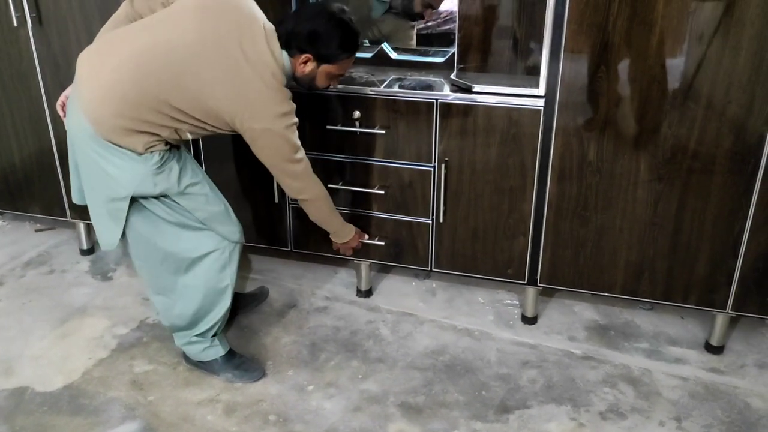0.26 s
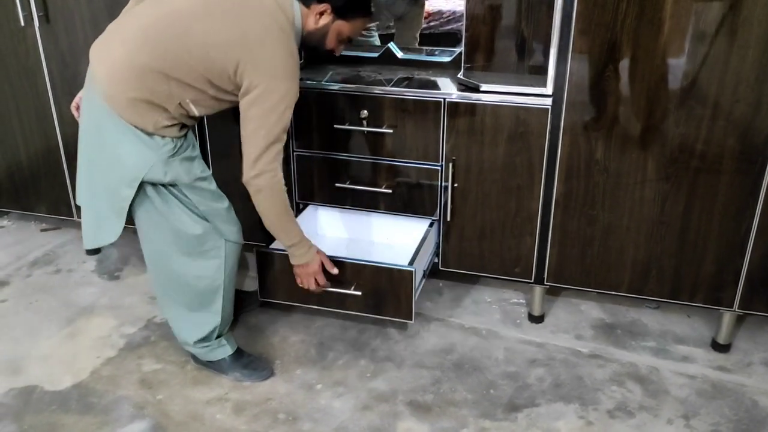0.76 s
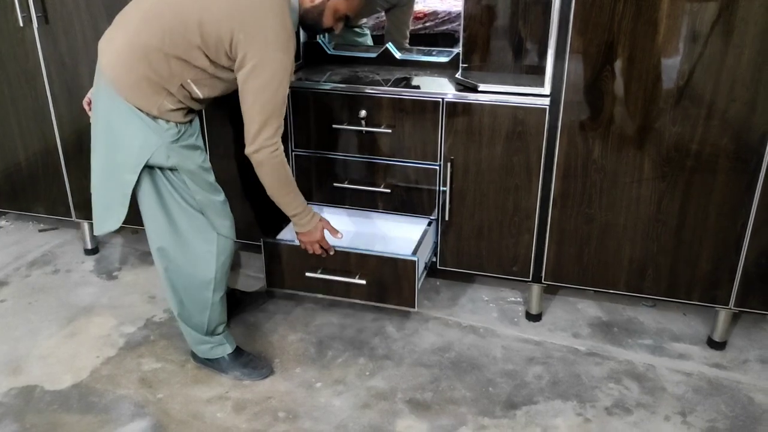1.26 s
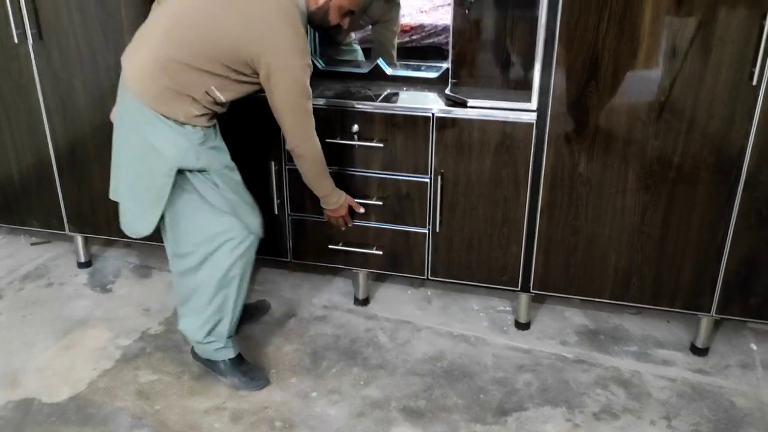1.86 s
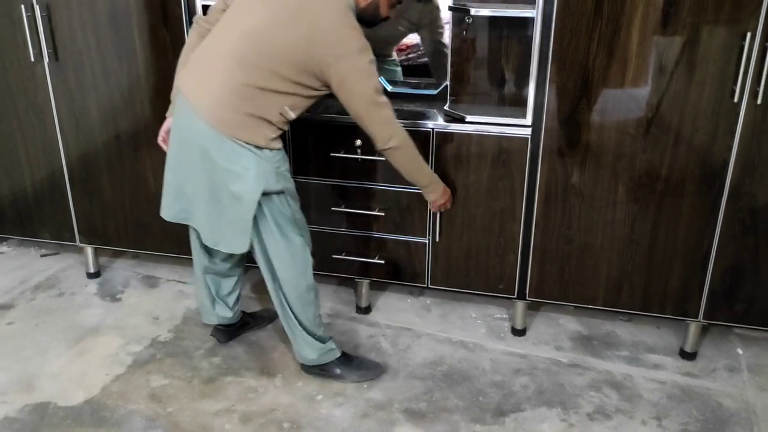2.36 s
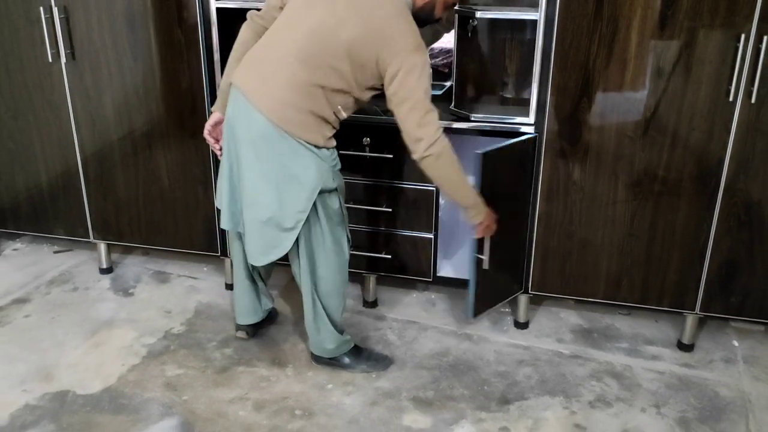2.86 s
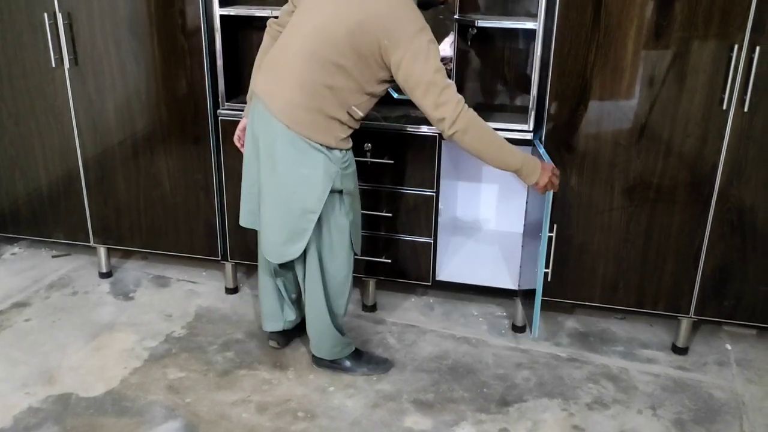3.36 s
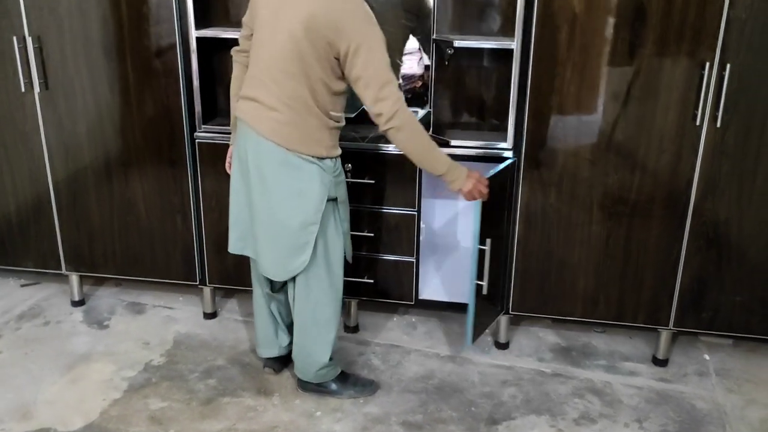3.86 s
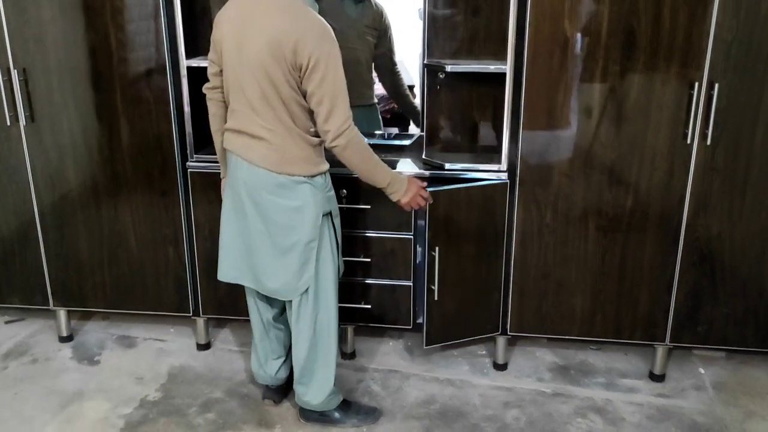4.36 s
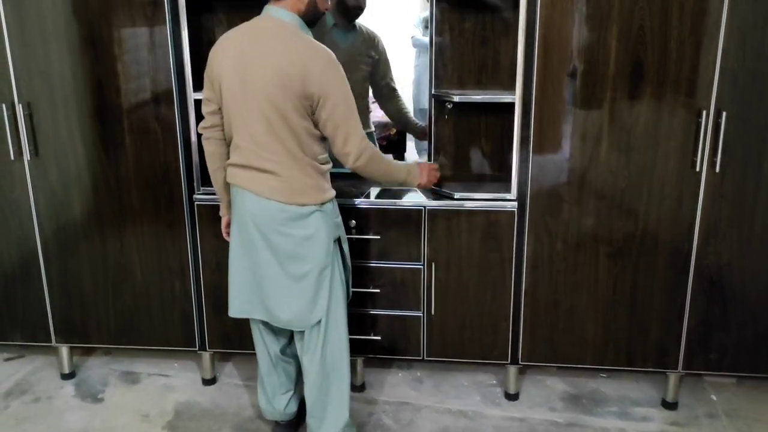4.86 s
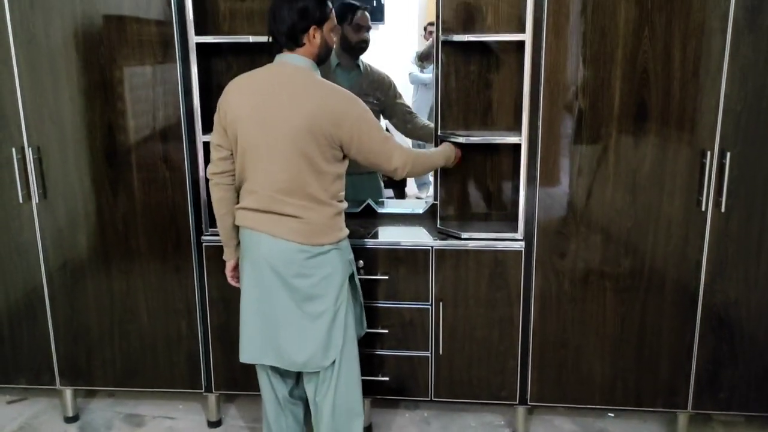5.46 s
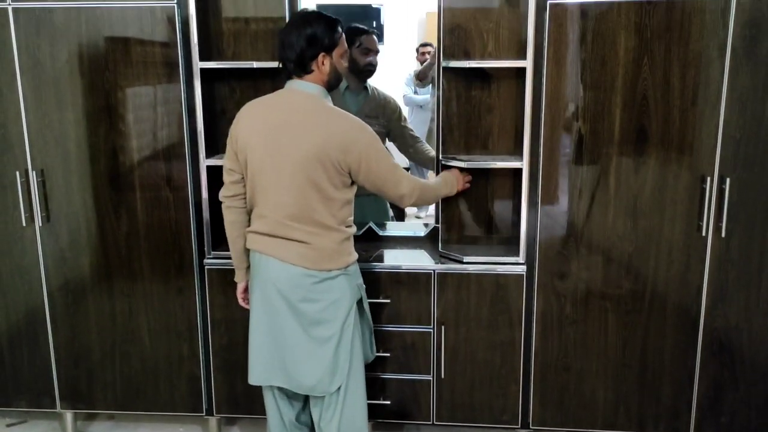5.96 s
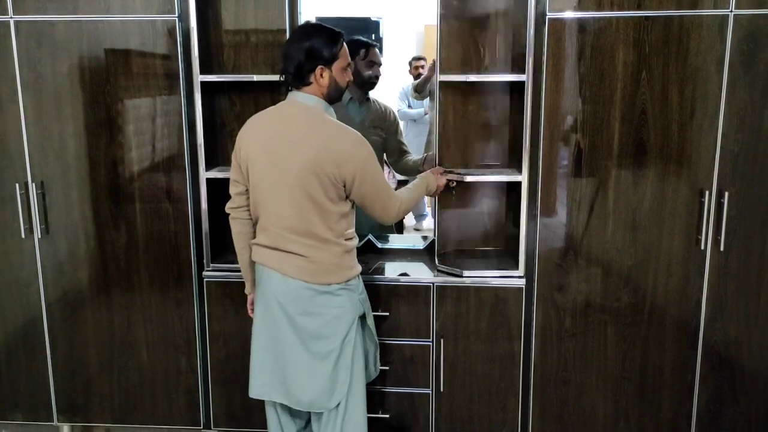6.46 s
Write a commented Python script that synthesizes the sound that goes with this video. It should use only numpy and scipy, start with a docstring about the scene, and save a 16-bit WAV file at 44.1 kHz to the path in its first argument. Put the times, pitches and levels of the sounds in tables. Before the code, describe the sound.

In a bare echoing workshop, a drawer rumbles open and closed, soft scuffs follow, a cupboard door slams boomily, and a thin upper door snaps and squeaks faintly.

```python
"""A drawer is heard first, rolling out with dull bumps to its stop; it rattles, then rolls shut onto its frame.
Steps and cloth follow, a cupboard door bangs, and a small upper door knocks, snaps, squeaks and clacks.
Place: a bare, echoing workshop with still air and a faint hum. Distance: a couple of metres.
Microphone: a stereo pair, bright near 7 kHz. Blows are coloured noise with a crack, a room tail and panel modes;
movements are noise under slow gain curves, and the squeak and hum are sines."""
import sys
import numpy as np
from scipy import signal
from scipy.fft import rfft, irfft, next_fast_len
from scipy.io import wavfile
from scipy.ndimage import uniform_filter1d, map_coordinates

SR = 44100
rng = np.random.default_rng(int(sys.argv[2]) if len(sys.argv) > 2 else 0)


def master_out(mix):
    """Clip the mix to full scale and print it as 16-bit PCM to the path in sys.argv[1]."""
    frames = np.transpose(np.atleast_2d(mix))
    ceiling = np.clip(frames, -1, 1)
    pcm = np.round(ceiling * 32767).astype(np.int16)
    wavfile.write(sys.argv[1], SR, pcm)


N = 296715

# Columns of every table of blows: t/s, level/dB, bass tilt/dB, treble tilt/dB, relative direct crack/dB,
# build-up time constant/s. Drawer on its stop, its loose bottom rattling on, drawer meeting its frame:
STOP_BLOWS = [(1.1849, -28, -11, -0.5, 11, 0.0072), (1.196, -26.5, 3, 2, 2, 0.0035)]
RATTLE_BLOWS = [(1.197, -28.5, -5, 0, 16, 0.0029), (1.238, -35, 3.5, 0.0029, 9.6, 0.0021),
                (1.268, -41.5, -5.5, 0, 10, 0.0045), (1.316, -48.5, 7, 0, 7.4, 0.0043),
                (1.354, -49, -10, 0.008, 8, .004), (1.372, -48, -3, 0.0083, 13, .004)]
FRAME_BLOWS = [(1.989, -38, 0, -9, 3, 0.0015), (1.997, -31.5, -0.024, 2.5, 2.2, 0.0017)]
# Cupboard door on catch and frame, soft knocks of its hinge (columns as above):
DOOR_BLOWS = [(4.1605, -20.5, -7.5, 3, 1.15, 0.002), (4.180, -22.5, 0.5, -5.5, 2.9, 0.0013)]
HINGE_KNOCKS = [(3.962, -70, 0.009, 0.0038, -2, 0.0045), (3.993, -77, 0.011, 0.0058, 7, 0.0032)]
# Wooden knocks and the snap of the upper door, and its later clack (columns as above):
UPPER_BLOWS = [(4.867, -43.5, 8.5, -1, -3, 0.0028), (5.0125, -29.5, 9.5, -1, 0, 0.0025),
               (5.058, -32, 14.5, -2, -25, 0.014), (5.175, -29.5, 0, 7.5, 1.5, 0.0024),
               (5.179, -28, -6, 2.5, 5.5, 0.007)]
CLACK_BLOWS = [(5.843, -39, 3.6, -7, -0.75, 0.0044)]
# Small ticks of runners, handles and hinges: t/s, level/dB, relative direct crack/dB
TICKS = [(0.018, -41, 9), (0.223, -51, 6), (.570, -46, 12), (0.684, -50, 8), (0.7, -39, 4.5),
         (1.396, -42, 9), (1.431, -47.5, 10), (1.673, -56, 13), (1.776, -44, 7), (2.202, -60, 2),
         (2.712, -54.5, 15), (4.557, -58, 11), (4.648, -61.5, 12.5), (6.031, -54.5, -14)]
# Dull bumps near the end of the drawer's travel: t/s, peak level/dB, f/Hz
BUMPS = [(0.938, -35, 260), (0.961, -26, 227.8), (.975, -27, 232), (.981, -33, 393), (1.009, -27.5, 215),
         (1.031, -30, 202), (1.052, -33, 193), (1.069, -29.5, 214), (1.092, -33.5, 220)]

# Panel modes of drawer box, carcass frame, cupboard door, upper door: f/Hz, relative level/dB, t60/s
DRAWER_MODES = [(70.5, 5, 0.5), (160, -7, 0.83), (205, -4.5, 0.69), (272, -2, 0.26), (320, -1, 0.74),
                (468, -8.5, 0.4), (536, -13, 0.46), (624, -7, 0.5), (754, -15, 0.35), (810, -15, .7),
                (897, -7, 0.35), (1744, -8, 0.35)]
FRAME_MODES = [(71.4, 10.5, 0.17), (106.3, -2.5, 0.49), (118.7, -7, 0.48), (163.7, -0.5, 0.53),
               (288, -10, 0.32), (441, -3, 0.37), (535, -5, 0.37), (670, 4.5, 0.13), (1027, -16, 0.69),
               (1390, -15, 0.35)]
DOOR_MODES = [(71.7, 3, 0.36), (168.8, -0.5, 0.41), (212, -20, 0.6), (242.4, -9.5, 0.25), (316, -10, 0.38),
              (352, -14.5, 0.6), (427, -21.5, 0.68), (498, -16.5, 0.44), (1177, -23, 0.51),
              (1400, -13, 0.33), (1475, -19.5, 0.38)]
UPPER_MODES = [(203, -8, 0.34), (288, -8.5, 0.51), (335.5, -6.5, 0.96), (566, -14.5, 0.71),
               (711, -8.5, 0.73), (778, -16, 0.47), (947, -8, 0.483), (970, -14.5, 0.97), (1303, -12, 0.56),
               (2020, -21, 0.46), (2190, -17, 0.37), (2700, -11, 0.22), (2970, 2, 0.31)]

# Colours of the blows: f/Hz, relative level/dB per Hz
STOP_COLOUR = [(25, -31.5), (50, -8.5), (120, -16), (200, -11.5), (330, -2.5), (400, -13.5), (480, -10),
               (600, -6.5), (1000, -14), (1250, -19), (1800, -15.5), (2650, -25), (2950, -24.5),
               (3700, -29.5), (5000, -33.5), (7100, -28), (15500, -71.5)]
RATTLE_COLOUR = [(120, -22.5), (300, 0.5), (400, -8.5), (500, -2), (620, 2.5), (720, -3.5), (850, -2),
                 (1100, -14), (2000, -23.5), (5000, -44.5), (9000, -62.5), (15500, -90.5)]
FRAME_COLOUR = [(25, -34), (50, -5), (130, -4.5), (220, -2.5), (340, -0.5), (400, -3.5), (650, -7),
                (770, -14), (1100, -13.5), (1250, -15.5), (2100, -16.5), (3100, -27.5), (4200, -26.5),
                (7100, -35.5), (15500, -69)]
DOOR_COLOUR = [(25, -33), (45, -14.5), (75, -9), (115, -13), (170, -3), (300, -9.5), (420, -14), (720, -14),
               (900, -16.5), (1100, -11.5), (1480, -11), (1650, -22), (1950, -13), (2350, -14),
               (2900, -22.5), (4200, -18), (4850, -23), (6000, -15), (7100, -12), (8600, -16), (10500, -30),
               (15500, -37.5)]
KNOCK_COLOUR = [(300, -18), (600, -2.5), (950, 4.5), (1400, -4), (2600, -5), (4000, -14), (12000, -45.5)]
UPPER_COLOUR = [(25, -45), (42, -25), (65, -22), (170, -17.5), (231, -19), (327, -11.5), (420, -19.5),
                (500, -21.5), (705, -14), (1150, -12.5), (1700, -11.5), (2450, -5), (3100, -10), (3700, -7),
                (4500, -9.5), (5100, -8.5), (5650, -12), (6450, 0.5), (6900, -3), (7380, -1), (8400, -10.5),
                (9740, -28), (10700, -37), (11500, -31), (15500, -43)]
CLACK_COLOUR = [(60, -32), (240, -27.5), (330, -3.5), (480, -20), (750, -5.5), (1100, -11.5), (1800, -14.5),
                (2120, -1), (2300, -9), (2650, -6.5), (3080, -2), (3500, -7.5), (5000, -5), (7200, -1),
                (8100, -25), (10000, -20), (15500, -45.5)]
STEEL_COLOUR = [(300, -33.5), (1500, -15.5), (3200, -16.5), (5000, -8.5), (7000, 1), (8500, -10.5),
                (10000, -25.5), (15500, -33)]
RAIL_COLOUR = [(400, -33.5), (1200, 3), (2500, -5.5), (4000, -2.0), (7000, -16.0), (11000, -28.5)]
# Colours of box rumble, rollers, soles, cloth and bearings, low swells, still air: f/Hz, relative level/dB per Hz
BOX_COLOUR = [(40, -21.5), (100, -14), (170, -8), (220, -0.5), (290, -9.5), (400, -17.5), (700, -70)]
ROLL_COLOUR = [(250, -20.5), (400, -1), (600, -3), (900, -2), (1400, -7.5), (2500, -10.5), (4000, -15),
               (7000, -49.5)]
SCUFF_COLOUR = [(150, -1.5), (300, -1), (600, 1.5), (1100, 1.5), (1600, -3), (2200, 0.5), (3200, -6),
                (4500, -8.5), (7000, -36)]
HISS_COLOUR = [(1500, -17), (3000, -7.5), (5000, -7.5), (6200, -1.5), (7200, 2.5), (8500, -8), (10000, -20),
               (12000, -28), (15500, -29)]
SWELL_COLOUR = [(15, -10), (32, -4), (50, -10), (90, -10), (160, -49)]
AIR_COLOUR = [(20, -1.5), (33, -20.5), (76, -7.5), (98, -24), (135, -9), (175, -10), (250, -17.5),
              (550, -23.5), (2500, -31), (5100, -28), (7100, -21), (8700, -29), (10500, -49.5),
              (15500, -63.5)]

# Pulls and pushes of the drawer: t/s, rise/s, hold/s, box rumble level/dB, rolling level/dB, bearing hiss level/dB
TRAVELS = [(0, 0.0026, 0.047, -36.5, -42, -45.5), (.41, 0.053, 0.1, -69.5, -56, -56),
           (.56, 0.066, 0.038, -46, -52, -75), (.675, 0.048, 0.081, -54, -45.5, -41.5),
           (.72, 0.13, 0.15, -54, -50.5, -64.5), (.92, 0.091, 0.025, -40.5, -55.5, -50),
           (1.52, 0.013, 0.014, -74, -62, -49), (1.665, 0.008, 0.082, -50.5, -55.5, -52.5),
           (1.83, 0.14, 0.04, -61, -82, -44.5), (2.06, 0.054, 0.082, -75, -57.5, -46)]
# Soles and sleeves sliding: t/s, rise/s, hold/s, scuff level/dB, cloth hiss level/dB
SHUFFLES = [(2.2, 0.071, 0.088, -56, -59), (2.37, 0.124, 0.2, -60, -49), (2.64, 0.13, 0.027, -50, -48),
            (2.74, 0.1, 0.038, -72, -44), (4.5, 0.062, 0.18, -57.5, -86), (4.76, 0.019, 0.12, -56, -66),
            (5.6, 0.012, 0.051, -64, -62), (6.1, 0.019, 0.088, -68.5, -81.5),
            (6.31, 0.015, 0.0075, -66.5, -64), (6.48, 0.012, 0.11, -69.5, -66)]
# Swings of the upper door that set the carcass murmuring: t/s, rise/s, hold/s, level/dB
SWINGS = [(5.62, 0.066, 0.082, -65.5), (5.88, 0.066, 0.036, -57), (6.62, 0.06, 0.057, -63.5)]
# Very low swells around the drawer's closing and before the door's bang: t/s, rise/s, hold/s, level/dB
LOW_SWELLS = [(1.45, 0.12, 0.201, -58), (1.85, 0.085, 0.042, -52.5), (4.07, 0.14, 0.0092, -61.5)]
# Pitch of the rollers' whirr: t/s, f/Hz
WHIRR = [(0.049, 573.6), (.55, 470.3), (.7, 538.4), (.87, 640), (1.0, 540), (1.601, 600)]
# Squeak of the upper door's hinge: t/s, f/Hz, level/dB
SQUEAK = [(5.585, 652, -90), (5.615, 650, -70), (5.643, 650, -68), (5.653, 650, -57.5), (5.695, 646, -57),
          (5.715, 642, -66), (5.78, 644, -66.5), (5.805, 646, -90)]
# Steady tones of the hum: f/Hz, middle level/dB about which it wavers
HUM = [(140.0, -80), (177.6, -80)]

# Reverberation of the workshop: f/Hz, t60/s
ROOM = [(60, 1), (160, 1), (420, 0.63), (1100, 0.73), (2900, 0.62), (7500, 0.47), (14000, 0.26)]
# Likeness of diffuse sound at the two sides: f/Hz, correlation [0 to 1]
ALIKE = [(100, 0.84), (250, 0.9), (500, 0.84), (1000, 0), (2000, 0), (12000, 0)]
# Balance of the microphone pair: f/Hz, left minus right level/dB
LEAN = [(100, 4), (300, 4.5), (1000, 0.5), (4000, -0.5), (7000, -3.5), (14000, -1)]
# Share of a panel's full peak and dip depth: f/Hz, share [0 to 1]
UNEVENNESS = [(350, 0), (900, 1), (2500, 1), (6000, .6)]

# Rebounds after the last bump: spacing, loss at each, middle pitch
JUDDER_S, JUDDER_LOSS_DB, JUDDER_HZ = 0.023, 8, 202
# Fades once a motion stops
BOX_FADE_DB_PER_S, ROLL_FADE_DB_PER_S, HISS_FADE_DB_PER_S, SCUFF_FADE_DB_PER_S = 58, 67, 101, 85
UNSTEADY_DB, UNSTEADY_PER_S = 1.5, 32  # movements are uneven: random spread in level, draws a second
EASE_S = 0.05  # a hand or foot never starts or stops at once
UPPER_RING_DB, CLACK_RING_DB = -18.5, -13  # the upper door's ring against each blow
WHIRR_DB, WHIRR_HALF_WIDTH_HZ, ROLL_DB = -3.5, 110, -1  # the mix of whirr and plain roller noise
SQUEAK_SECOND_HZ = 1150  # second resonance at the squeak's first pitch
TOP_HZ = 15500


def drawer():
    """The drawer rolls, bumps, hits its stop, rattles and meets its frame, ringing the box or the carcass."""
    out = np.zeros((2, N))
    impacts = [(STOP_BLOWS, STOP_COLOUR, DRAWER_MODES), (FRAME_BLOWS, FRAME_COLOUR, FRAME_MODES)]
    for rows, spectrum, modes in impacts:
        out += blows(rows, spectrum, resonances(depth_db=4.5, spacing_hz=45.0), crack_life=0.0033)
        s, db, *_ = rows[-1]  # the second, heavier contact rings the panels
        add(out, s, amp(db) * ring(modes, cycles=2.3, scatter_db=2))
    loose_bottom = resonances(depth_db=3, spacing_hz=46.47)
    out += blows(RATTLE_BLOWS, RATTLE_COLOUR, loose_bottom, crack_life=0.0033)
    t = np.arange(SR // 8) / SR
    for s, db, hz in judder(count=2):
        age = t / 0.0043
        swell = age * np.exp(1 - age)  # peaks at 1 after 4.3 ms
        add(out, s, amp(db) * swell * np.sin(2 * np.pi * hz * t))
    rumble = strokes(TRAVELS, BOX_FADE_DB_PER_S, axis=3) * rush(BOX_COLOUR)
    rollers = amp(ROLL_DB) * grainy(ROLL_COLOUR, rate=160, grain_db=-8) + amp(WHIRR_DB) * whirr()
    rolling = strokes(TRAVELS, ROLL_FADE_DB_PER_S, axis=4) * rollers
    return out + rumble + rolling


def judder(count):
    """The bumps, followed by the ever weaker rebounds of the last: t/s, peak level/dB, f/Hz."""
    s, db, _ = BUMPS[-1]
    rebounds = []
    for k in range(1, count + 1):
        hz = JUDDER_HZ * (1 + .04 * rng.standard_normal())
        rebounds.append((s + k * JUDDER_S, db - k * JUDDER_LOSS_DB, hz))
    return list(BUMPS) + rebounds


def whirr():
    """A narrow, grainy band of roller noise of rms 1, moved onto a gliding pitch by two carriers in quadrature."""
    pitch = np.interp(np.arange(N) / SR, *np.transpose(WHIRR))
    phase = 2 * np.pi * np.cumsum(pitch) / SR
    width = WHIRR_HALF_WIDTH_HZ
    band = [(width, 0), (4 * width, -30), (20 * width, -90)]
    return unit(sum(turn(phase) * grainy(band, rate=60, grain_db=-2) for turn in (np.cos, np.sin)))


def runner_knock():
    """Halfway out, the telescopic runner picks up its second rail with a steely knock."""
    out = np.zeros((2, N))
    body = resonances(depth_db=1.5, spacing_hz=71.5)
    knock = strike(RAIL_COLOUR, body, crack_db=13.5, rise=0.015, crack_life=0.0064)
    add(out, .725, amp(-52.5) * knock)
    return out


def cupboard_door():
    """The hinge knocks softly; the door meets its catch, then slaps the frame, and its panel booms."""
    body = resonances(depth_db=2.2, spacing_hz=50.44)
    out = blows(DOOR_BLOWS, DOOR_COLOUR, body, crack_life=0.0038)
    out += blows(HINGE_KNOCKS, KNOCK_COLOUR, body, crack_life=0.006)
    s, db, *_ = DOOR_BLOWS[0]
    # the boom begins between the two contacts
    add(out, s + 0.0096, amp(db + 5.0) * ring(DOOR_MODES, cycles=4.6, scatter_db=1.0))
    return out


def upper_door():
    """The thin door knocks, snaps and rings, and later clacks; the carcass murmurs as it swings."""
    body = resonances(depth_db=2.2, spacing_hz=40.94)
    out = blows(UPPER_BLOWS, UPPER_COLOUR, body, crack_life=0.0035)
    out += blows(CLACK_BLOWS, CLACK_COLOUR, body, crack_life=.004)
    for rows, ring_db in (UPPER_BLOWS, UPPER_RING_DB), (CLACK_BLOWS, CLACK_RING_DB):
        for s, db, bass_db, *_ in rows:
            level = amp(db + bass_db / 2 + ring_db)  # bassier blows ring the panel more
            add(out, s, level * ring(UPPER_MODES, cycles=7.8, scatter_db=2.5))
    return out + strokes(SWINGS, BOX_FADE_DB_PER_S) * rush(BOX_COLOUR)


def hinge():
    """A faint stick-slip squeak: a wavering tone with a weak octave and second resonance, echoed by the room."""
    t = np.arange(N) / SR
    s, hz, db = np.transpose(SQUEAK)
    waver = unit(uniform_filter1d(rng.standard_normal(N), 200))
    pitch = np.interp(t, s, hz) * (1 + .014 * waver)
    phase = 2 * np.pi * np.cumsum(pitch) / SR
    overtones = np.sin(2 * phase) + np.sin(phase * SQUEAK_SECOND_HZ / hz[0])
    tone = unit(np.sin(phase) + amp(-20) * overtones)
    sounding = (t > s[0]) * (t < s[-1])
    squeak = amp(np.interp(t, s, db)) * sounding * tone
    echo = signal.fftconvolve(squeak[None], unit(room_tail()) / np.sqrt(SR), axes=1)[:, :N]
    return squeak + .3 * echo


def fittings():
    """Steel runners, handles and hinges tick: very short cracks with a bright room tail."""
    out = np.zeros((2, N))
    body = resonances(depth_db=6.5, spacing_hz=69.7)
    for s, db, crack_db in TICKS:
        add(out, s, amp(db) * strike(STEEL_COLOUR, body, crack_db, rise=0.013, crack_life=0.0011))
    return out


def rubbing():
    """Soles scuff the concrete and cloth and bearings hiss: friction noise made of many tiny contacts."""
    scuff = strokes(SHUFFLES, SCUFF_FADE_DB_PER_S, axis=3) * grainy(SCUFF_COLOUR, rate=69, grain_db=-8.5)
    cloth = strokes(SHUFFLES, HISS_FADE_DB_PER_S, axis=4) * grainy(HISS_COLOUR, rate=400, grain_db=-14.0)
    bearings = strokes(TRAVELS, HISS_FADE_DB_PER_S, axis=5) * grainy(HISS_COLOUR, rate=320, grain_db=-12)
    return scuff + cloth + bearings


def low_swells():
    """Swells of very low noise around the drawer's closing and before the door's bang."""
    return strokes(LOW_SWELLS, BOX_FADE_DB_PER_S) * rush(SWELL_COLOUR)


def still_air():
    """The steady, mostly low noise of the workshop's air."""
    return amp(-66.5) * rush(AIR_COLOUR)


def hum():
    """A faint low hum: sines that waver slowly in level, alike on both sides."""
    t = np.arange(N) / SR
    out = np.zeros(N)
    for hz, db in HUM:
        waver = map_coordinates(rng.standard_normal(20), [t * 2])  # two draws a second
        out += amp(db + 2.5 * waver) * unit(np.sin(2 * np.pi * (hz * t + rng.random())))
    return out


def blows(rows, spectrum, body, crack_life):
    """All the contacts of one object, each with its own level, tilt, crack and build-up."""
    out = np.zeros((2, N))
    for s, db, bass_db, treble_db, crack_db, rise in rows:
        add(out, s, amp(db) * strike(spectrum, body, crack_db, rise, crack_life, bass_db, treble_db))
    return out


def strike(spectrum, body, crack_db, rise, crack_life, bass_db=0, treble_db=0):
    """One contact: a brief direct crack, then the room fills and dies away, both in the object's colour."""
    t = np.arange(SR) / SR
    direct = unit(rng.standard_normal(SR) + amp(8.0) * diffuse(SR))  # a share is common to both sides
    crack_shape = np.exp(-t / crack_life) - np.exp(-5 * t / crack_life)
    crack = amp(crack_db + 6.5) * crack_shape * direct
    # early echoes come in clumps
    flutter = np.interp(t, np.linspace(0, 1, 300), rng.standard_normal(300))
    clumps = amp(2.9 * flutter * np.exp(-t / 0.15))
    wash = room_tail() * (1 - np.exp(-t / rise)) * clumps
    colour = lambda hz: along(spectrum, hz) + along(body, hz)
    norm = np.sqrt(np.mean(amp(colour(np.fft.rfftfreq(SR, 1 / SR))) ** 2))
    # a heavy contact adds bass, a hard one treble
    tone = [(200, bass_db), (1500, 0.0094), (2900, 0.0051), (6000, treble_db)]
    return coloured(crack + wash, lambda hz: amp(colour(hz) + along(tone, hz))) / norm


def ring(modes, cycles, scatter_db):
    """Panel modes swell over a few cycles and fade; the higher ones reach the two sides more out of step."""
    t = np.arange(SR) / SR
    hz, db, t60 = np.transpose(modes)[:, :, None]
    size, phase, skew = rng.standard_normal((3, len(modes), 1))
    fade = amp(db + scatter_db * size - 60 * t / t60)
    swell = fade * (1 - np.exp(-t * hz / cycles))
    lag = skew * np.minimum(hz / 12000, .25)  # in cycles
    sides = [np.sum(swell * np.sin(2 * np.pi * (hz * t + phase + ear * lag)), axis=0) for ear in (-1, 1)]
    return np.array(sides)


def resonances(depth_db, spacing_hz):
    """A panel's crowded upper modes as uneven peaks and dips, shallower in the high treble: f/Hz, level/dB."""
    hz = spacing_hz * np.arange(1, 400)
    depth = depth_db * along(UNEVENNESS, hz)
    return np.transpose([hz, depth * np.clip(rng.standard_normal(len(hz)), -2, 1)])


def strokes(rows, fade, axis=3):
    """Gain of a series of slightly unsteady movements that ease in and out, at the levels in one column."""
    power = sum(stroke(*row[:3], row[axis], fade) ** 2 for row in rows)
    grip = map_coordinates(rng.standard_normal(1000), [np.arange(N) * UNSTEADY_PER_S / SR], mode="wrap")
    eased = uniform_filter1d(np.sqrt(power), max(round(EASE_S * SR), 1))
    return eased * amp(UNSTEADY_DB * grip)


def stroke(s, rise, hold, db, fade):
    """Gain of one movement: it rises, holds, then dies away at fade dB a second."""
    age = np.arange(N) / SR - s
    onset = np.clip(age / max(rise, .001), 0, 1)
    return onset * amp(db - fade * np.maximum(age - rise - hold, 0))


def grainy(spectrum, rate, grain_db):
    """Noise of rms 1 with tiny random contacts, rate a second on each side, standing out of it."""
    contacts = (rng.random((2, N)) < rate / SR) * rng.standard_normal((2, N))
    rough = diffuse(N) + amp(grain_db) * unit(contacts)
    return unit(coloured(rough, lambda hz: amp(along(spectrum, hz))))


def rush(spectrum):
    """Steady stereo noise of rms 1 in a given colour."""
    return unit(coloured(diffuse(N), lambda hz: amp(along(spectrum, hz))))


def room_tail():
    """A second of fresh reverberation that starts near rms 1; the high treble dies first."""
    hz, t, z = signal.stft(diffuse(SR), SR, nperseg=256)
    decay = amp(-60 * t / along(ROOM, hz)[:, None])
    return signal.istft(z * decay, SR, nperseg=256)[1][:, :SR]


def diffuse(size):
    """White noise from all round the room: alike on both sides in the bass only."""
    likeness = along(ALIKE, np.fft.rfftfreq(size, 1 / SR))
    turn = np.arccos(np.clip(likeness, -1, 1)) / 2
    mid, side = rfft(rng.standard_normal((2, size))) * [np.cos(turn), np.sin(turn)]
    return irfft(np.array([mid + side, mid - side]), size)


def coloured(x, gain):
    """x through the causal minimum-phase filter with this gain of frequency, found by folding the cepstrum."""
    size = 2 * next_fast_len(x.shape[-1] // 2 + 4096)
    cepstrum = irfft(np.log(np.maximum(gain(np.fft.rfftfreq(size, 1 / SR)), 1e-6)))
    cepstrum[1:size // 2] *= 2
    cepstrum[size // 2 + 1:] = 0
    return irfft(rfft(x, size) * np.exp(rfft(cepstrum)), size)[..., :x.shape[-1]]


def add(track, s, sound):
    """Mix a sound into the track at time s."""
    part = track[..., max(round(s * SR), 0):][..., :sound.shape[-1]]
    part += sound[..., :part.shape[-1]]


def along(points, hz):
    """(f/Hz, value) points read on a log frequency axis."""
    f, v = np.transpose(points)
    return np.interp(np.log(hz + 1), np.log(f + 1), v)


def unit(x):
    """Scaled to rms 1."""
    return x / np.sqrt(np.mean(x ** 2) + 1e-20)


def amp(db):
    """Decibels to gain."""
    return 10 ** (np.asarray(db) / 20)


def scene():
    """All the furniture and footwork over the still air and hum of the workshop."""
    furniture = drawer() + runner_knock() + cupboard_door() + upper_door() + hinge() + fittings()
    return furniture + rubbing() + low_swells() + still_air() + hum()


def record(dry):
    """The left microphone hears more bass, the right more treble; nothing passes the band limit."""
    size = next_fast_len(N + SR // 2)
    hz = np.fft.rfftfreq(size, 1 / SR)
    sides = amp(along(LEAN, hz) * np.array([[.5], [-.5]]))
    return irfft(rfft(dry, size) * sides * (hz < TOP_HZ), size)[:, :N]


dry = scene()
out = record(dry)
master_out(out)
```